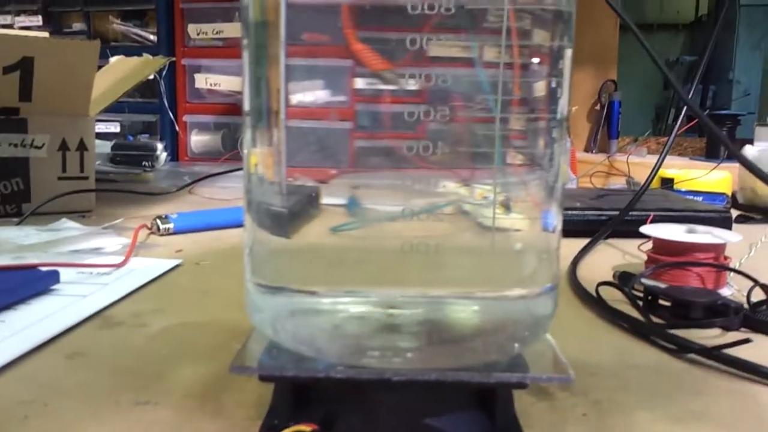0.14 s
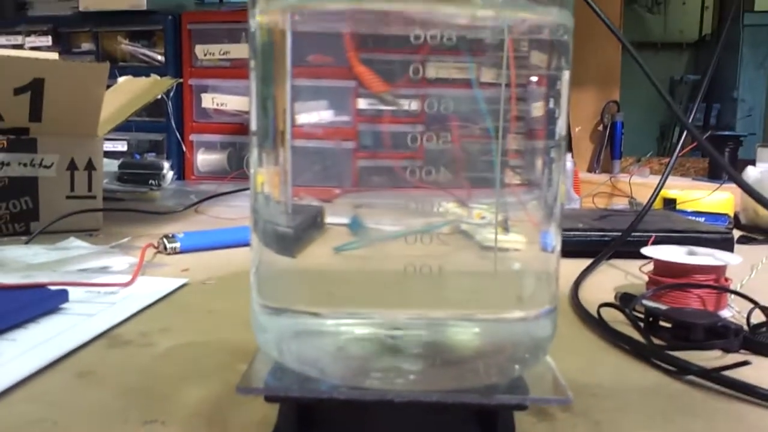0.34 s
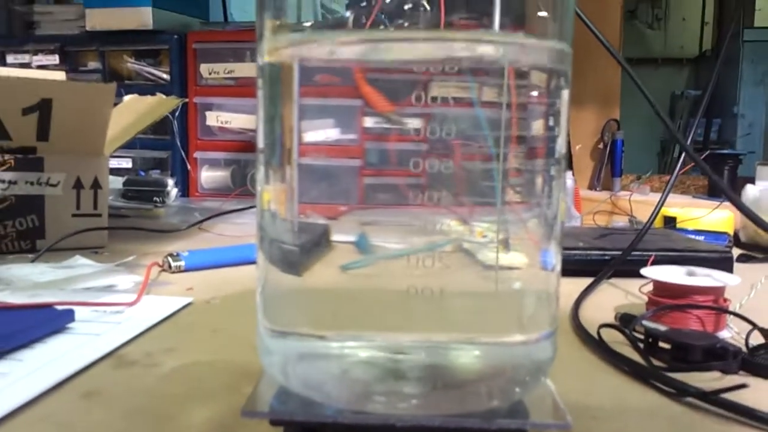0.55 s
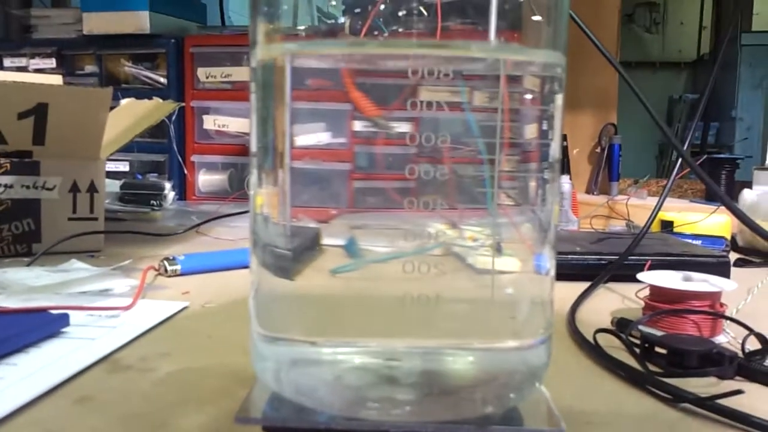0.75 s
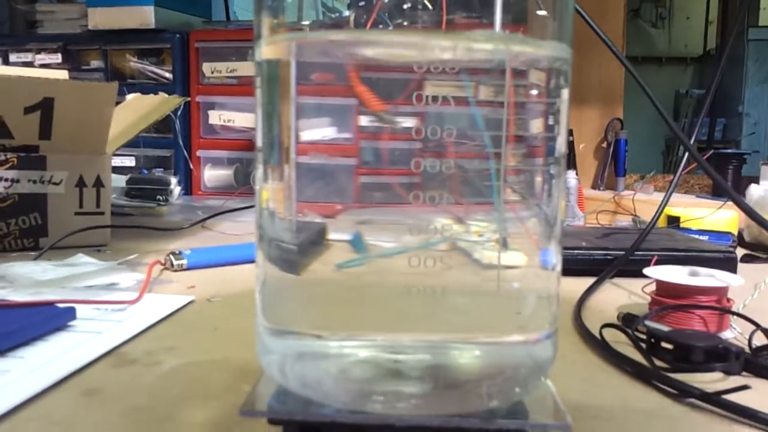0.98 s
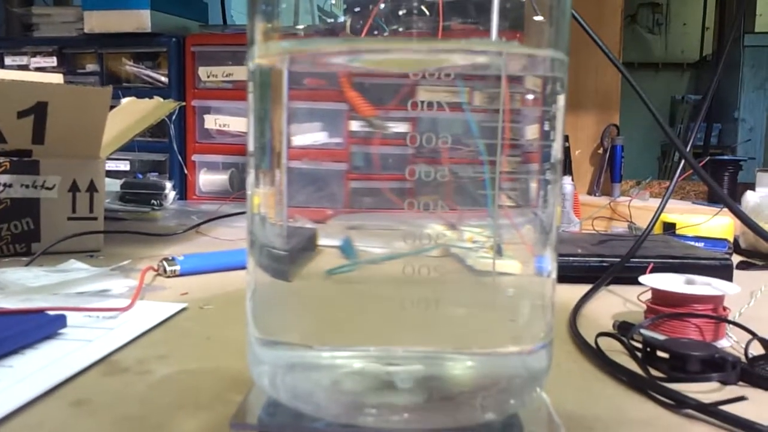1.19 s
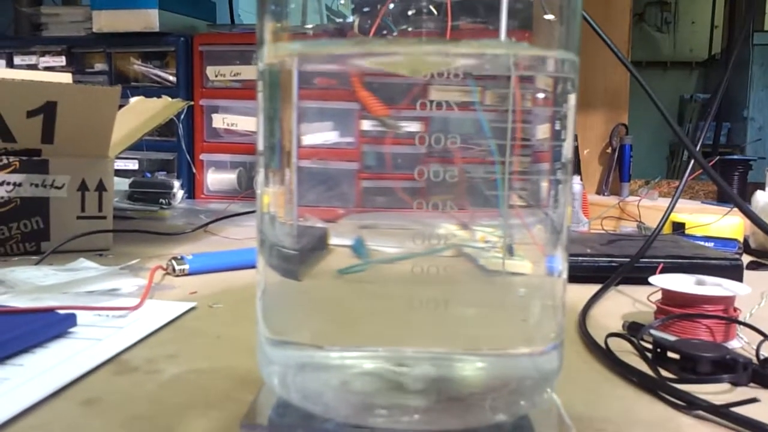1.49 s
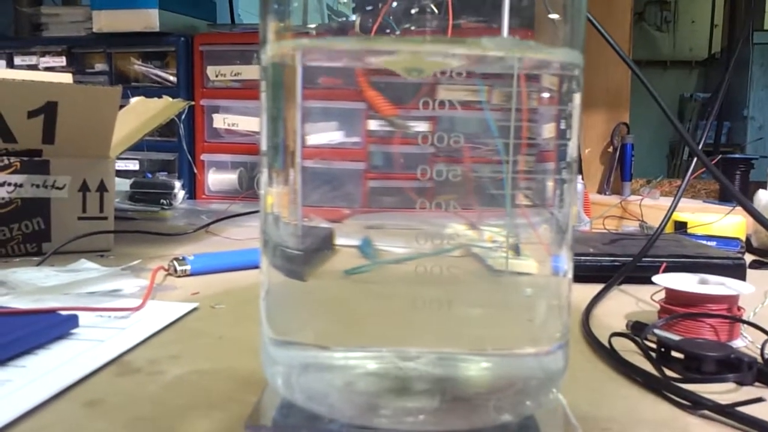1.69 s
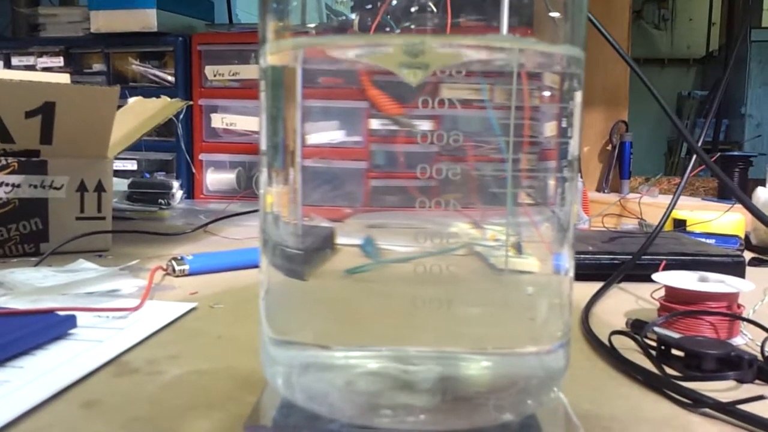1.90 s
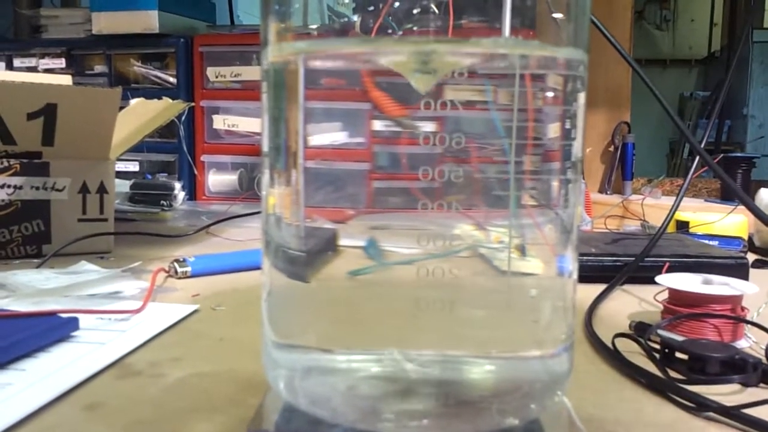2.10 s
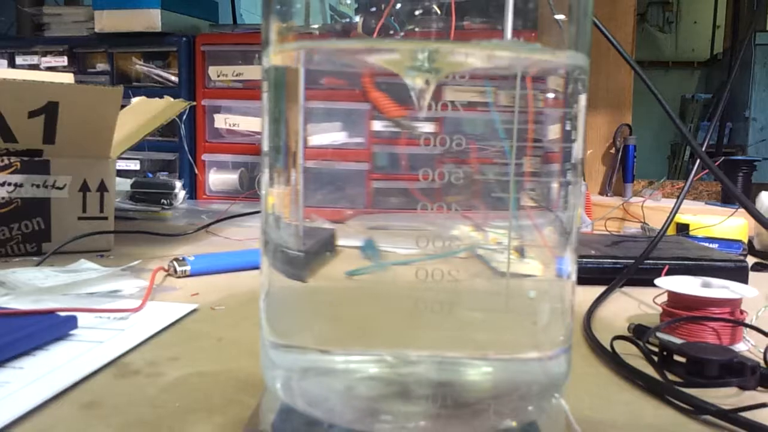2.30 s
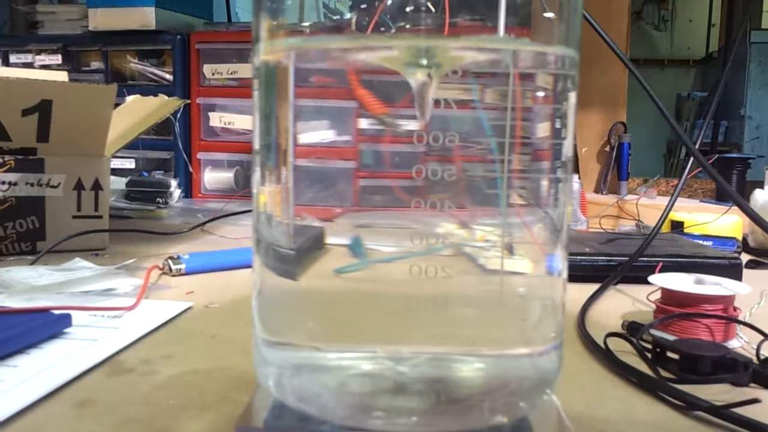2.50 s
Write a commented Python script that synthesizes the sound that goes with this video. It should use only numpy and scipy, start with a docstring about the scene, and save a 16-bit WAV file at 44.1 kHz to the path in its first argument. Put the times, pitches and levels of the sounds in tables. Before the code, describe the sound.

A stir bar rattles rapidly against a glass beaker of water, then settles into a wobbling scrape

```python
"""Knocks of a stir bar on a glass beaker of water come first, faster and faster, over a bright scrape.
The bar then settles into a duller, wobbling scrape with a few stray knocks.
Contact forces of noise bursts and random grains excite the resonances of the glass; a short room follows.
Short low thumps sound under three of the knocks, and a fan motor adds faint hum and a rush of air.
The hardest knocks overload the microphone, which clips them."""
import sys
import numpy as np
from scipy import signal
from scipy.fft import rfft, irfft
from scipy.io import wavfile

SR = 44100
rng = np.random.default_rng(int(sys.argv[2]) if len(sys.argv) > 2 else 0)


def log_audio(samples):
    """Write samples as a 16-bit WAV file to the path given in sys.argv[1]."""
    # one column per channel
    frames = np.atleast_2d(samples).T
    # limit to full scale, then quantise
    limited = np.clip(frames, -1, 1)
    pcm = np.round(limited * 32767).astype(np.int16)
    wavfile.write(sys.argv[1], SR, pcm)


N = 116865  # length [samples]


def amp(db):
    """Level law: decibels to an amplitude ratio."""
    return 10 ** (np.asarray(db) / 20)


def unit(x):
    """Normalization: scales the root mean square to 1."""
    return x / np.sqrt(np.mean(x ** 2) + 1e-20)


def read(points, hz):
    """Spectral interpolation: joins levels in dB linearly along a log-frequency axis."""
    f, db = np.transpose(points)
    return np.interp(np.log(hz + 1), np.log(f + 1), db)


def add(mix, s, sound):
    """Superposition: adds a sound into the mix from time s [s], cut at the end."""
    part = mix[max(round(s * SR), 0):][:len(sound)]
    part += sound[:len(part)]


def knocks():
    """Impact excitation: a hard contact, a brief skid and a soft rebound each set the glass ringing."""
    # blows of the bar on the glass: (time [s], relative strength [dB])
    blows = [(0.0351, -8.5), (0.05, -9.5), (0.0784, -9.5), (0.1253, -5.5), (0.1812, -7.5), (0.2215, -9.0),
             (0.2344, -8.0), (0.2628, -7.5), (0.2869, -8.5), (0.3147, -5.5), (0.3264, -9.0), (0.3645, -4.5),
             (0.4119, -7.0), (0.4384, -7.5), (0.4624, -7.5), (0.4872, -6.0), (0.4983, -9.0), (0.5341, -8.0),
             (0.5679, -10.0), (0.5802, -5.0), (0.6023, -8.5), (0.6233, -7.0), (0.6455, -8.0),
             (0.6697, -7.5), (0.6923, -7.0), (0.7358, -5.0), (0.767, -9.5), (0.7788, -5.0), (0.7995, -8.0),
             (0.8211, -8.0), (0.8425, -7.5), (0.8643, -6.0), (0.8855, -5.0), (0.9049, -7.0), (0.9269, -4.5),
             (0.9675, -5.0), (0.9868, -9.5), (1.006, -6.5), (1.0278, -6.5), (1.048, -5.0), (1.068, -5.5),
             (1.0882, -8.0), (1.1077, -6.5), (1.1178, -9.5), (1.1472, -8.0), (1.1857, -5.5),
             (1.1949, -10.0), (1.2245, -6.5), (1.243, -9.0), (1.2629, -7.0), (1.2816, -6.5), (1.3165, -6.0),
             (1.352, -7.5), (1.3715, -9.5), (1.3893, -8.0), (1.3982, -9.5), (1.4053, -9.0), (1.416, -10.0),
             (1.4258, -8.0), (1.4742, -8.0), (1.4822, -7.0), (1.4905, -7.5), (1.4998, -8.0), (1.5088, -9.5),
             (1.5263, -8.5), (1.5507, -10.0), (1.5591, -4.5), (1.5919, -4.0), (1.8303, -3.0),
             (1.8848, -6.5), (1.892, -6.0), (1.9469, -6.0), (2.0015, -5.5), (2.0629, -2.0), (2.1794, -7.0),
             (2.223, -4.5), (2.2302, -6.5), (2.3948, -3.5)]
    # colour of a blow: (frequency [Hz], relative level [dB])
    blow_tone = [(60, -6), (300, -9), (1000, -4), (3000, -7.5), (5500, -5.5), (7500, 0.5), (8400, 5),
                 (9200, 2), (11000, 3.5), (15000, -5.5)]
    knock_db, rebound_db = 22, -14.5  # gain of all blows; rebound relative to its blow
    contact_s, skid_s, skid_gain = 0.00019, 0.0035, 4.7
    rebound_s = .0095  # mean delay of the rebound
    force = np.zeros(N)
    t = np.arange(512) / SR
    for s, db in blows:
        length, flight = rng.uniform(.8, 1.2, 2)
        contact = np.exp(-t / contact_s)
        skid = skid_gain / (1 + (t / (skid_s * length)) ** 6)
        envelope = contact + skid
        add(force, s, amp(knock_db + db) * burst(envelope))
        add(force, s + rebound_s * flight, amp(knock_db + db + rebound_db) * burst(envelope))
    return beaker(force, blow_tone)


def burst(envelope, count=2):
    """Broadband contact noise: alternates a flat spectrum with the envelope, then sets energy to 1."""
    x = rng.standard_normal(len(envelope)) * envelope
    for _ in range(count):
        spectrum = rfft(x)
        flat = irfft(spectrum / (abs(spectrum) + 1e-12), len(x))
        x = flat * np.sqrt(envelope)
    return x / np.linalg.norm(x)


def scrape():
    """Sliding friction: pressure modulates random grains, bright while rattling, duller once settled."""
    # pressure of the bar on the bottom: (time [s], relative level [dB])
    pressing = [(0, -15.5), (.22, -16.5), (.6, -15), (1.0, -15), (1.42, -15.5), (1.445, -17.5),
                (1.47, -15.5), (1.61, -15), (1.63, -14.5), (1.83, -13), (1.865, -16), (1.89, -14),
                (2.1, -13.5), (2.39, -12), (2.425, -12.5), (2.46, -14), (2.65, -12)]
    # colour while the bar rattles: (frequency [Hz], relative level [dB])
    rattle_tone = [(60, -14), (300, -1), (1000, 4.5), (3000, 1), (5500, 4), (8400, 1.5), (9200, -1),
                   (11000, 0.5), (15000, -5.5)]
    # colour once the bar has settled: (frequency [Hz], relative level [dB])
    settled_tone = [(60, -6), (300, 2.5), (1000, -1), (2200, 2.5), (3000, -3), (3500, -0.5), (5500, 2.5),
                    (7400, 1.5), (8400, -4), (9150, 2), (10000, -1.5), (12000, -3.5), (15000, -12.5)]
    settled_s = 1.6
    wobble_hz, wobble_peak_s, wobble_db = 17.7, 2.062, 2  # presses harder once per wobble
    taps_db, settled_taps = 9, .35  # tap depth, and the share of it kept once settled
    rough_db = 1.4  # rms of the random flutter
    t = np.arange(N) / SR
    settled = t > settled_s
    wobble = wobble_db * settled * np.cos(2 * np.pi * wobble_hz * (t - wobble_peak_s))
    jabs = taps()
    tapping = taps_db * np.where(settled, settled_taps, 1) * (jabs - jabs.mean())
    roughness = rough_db * drift(rate_hz=68)
    level_db = np.interp(t, *np.transpose(pressing)) + wobble + tapping + roughness
    force = amp(level_db) * grains(per_s=9000, spread_db=0.5)
    rattling = beaker(force * ~settled, rattle_tone)
    sliding = beaker(force * settled, settled_tone)
    return rattling + sliding


def taps(count=400):
    """Jittered pulse train: one light jab of pressure (0-1) at a random moment of every time slot."""
    taps_per_s, tap_s = 100, .003  # slot rate, time for a jab to fall to half
    jabs = np.zeros(N)
    t = np.arange(1024) / SR
    for k, (late, size) in enumerate(rng.random((count, 2))):
        add(jabs, (k + late) / taps_per_s, (.5 + .5 * size) / (1 + (t / tap_s) ** 4))
    return np.minimum(jabs, 1)


def grains(per_s, spread_db):
    """Shot noise: tiny impacts of random time, sign and uneven size, at rms 1."""
    size = amp(spread_db * np.minimum(rng.exponential(1, N), 3)) * rng.choice([-1, 1], N)
    return unit(size * (rng.random(N) < per_s / SR))


def drift(rate_hz):
    """Band-limited random modulation of rms 1, strongest at half of rate_hz."""
    f = np.fft.rfftfreq(N, 1 / SR) / rate_hz
    return unit(irfft(rfft(rng.standard_normal(N)) * np.sqrt(f) * np.exp(-f ** 2), N))


def beaker(force, tone, size=8192):
    """Modal resonance: a contact force drives the glass as a minimum-phase filter of energy 1."""
    # modes of the filled beaker: (frequency [Hz], width [Hz], relative level [dB])
    glass_modes = [(875, 70, -18), (925, 44, -11.5), (1780, 44, -10.5), (3042, 21, 3.5), (3100, 90, -11),
                   (3558, 60, -9), (3995, 50, -1.5), (4045, 44, 1), (5315, 80, -5.5), (5930, 80, -6),
                   (6300, 140, -9), (6515, 50, -8), (7350, 320, -5), (8110, 190, -7), (8430, 170, -1),
                   (8610, 200, -4), (9080, 260, -1), (10000, 280, -5), (11650, 500, -9.5),
                   (12900, 600, -13.5), (13470, 140, -14)]
    # dense weak modes of the beaker and what it stands on: (frequency [Hz], relative level [dB])
    body = [(30, -76), (120, -40), (270, -28.5), (700, -34), (1300, -35.5), (2200, -24), (2850, -29.5),
            (3200, -17.5), (4700, -18), (6500, -14.5), (9500, -22.5), (10700, -19.5), (13300, -13),
            (14000, -17), (14800, -6), (15700, -20.5)]
    skirt = 1.39  # steepness of the flanks of each mode
    hz = abs(np.fft.fftfreq(size, 1 / SR)) + 1
    power = amp(read(body, hz)) ** 2
    for f, width, db in glass_modes:
        detuning = f / width * (hz / f - f / hz)
        power = power + amp(db) ** 2 / (1 + detuning ** 2) ** skirt
    gain = unit(np.sqrt(power) * amp(read(tone, hz)))
    # the Hilbert transform of the log gain gives the phase of a causal ring
    log_response = np.conj(signal.hilbert(np.log(gain + 1e-9)))
    ring = np.fft.ifft(np.exp(log_response)).real
    return signal.fftconvolve(force, ring[:size // 2])[:N]


def thumps():
    """Damped oscillation: a short, low, quickly damped thump under three knocks."""
    # low thumps: (time [s], amplitude before damping [dB])
    thump_starts = [(0.738, -36), (1.047, -34), (2.064, -27)]
    thump_hz, thump_s = 84.5, 0.0036  # pitch, decay time constant
    out = np.zeros(N)
    t = np.arange(2048) / SR
    for s, db in thump_starts:
        add(out, s, amp(db) * np.sin(2 * np.pi * thump_hz * t) * np.exp(-t / thump_s))
    return out


def room(x):
    """Diffuse reverberation: bench and shelves return an exponentially decaying noise tail of energy 1."""
    t60_s = 0.067
    t = np.arange(SR // 2) / SR
    tail = rng.standard_normal(len(t)) * 1000 ** (-t / t60_s)
    tail = tail * (t > .002)  # reflections start after 2 ms
    return signal.fftconvolve(x, tail / np.linalg.norm(tail))[:N]


def motor():
    """Frequency modulation: faint tones waver in pitch within the rush of air."""
    # motor tones: (frequency [Hz], rms level [dB])
    hum = [(140, -65.5), (180, -65), (250, -57), (335, -58), (550, -55)]
    air_db = -46.5
    tones = 0
    for hz, db in hum:
        wavering_hz = hz * (1 + 0.01184 * drift(rate_hz=8.4))
        tones = tones + amp(db) * np.sin(2 * np.pi * np.cumsum(wavering_hz) / SR)
    return np.sqrt(2) * tones + amp(air_db) * air()


def air():
    """Turbulence noise: white noise shaped into the soft rush of the fan, at rms 1."""
    # air from the fan: (frequency [Hz], relative spectral density [dB per Hz])
    rush = [(20, -36), (60, -35), (115, -7.5), (240, -13.5), (500, -2), (2000, -7), (15000, -41)]
    gain = amp(read(rush, np.fft.rfftfreq(N, 1 / SR)))
    return unit(irfft(rfft(rng.standard_normal(N)) * gain, N))


def scene():
    """Superposition of glass, room, low thumps and motor, alike in both channels."""
    room_db = -13.5
    glass = knocks() + scrape()
    mono = glass + amp(room_db) * room(glass) + thumps() + motor()
    return np.array([mono, mono])


def record(dry):
    """Amplitude limiting: the input clips hard knocks, then a low-pass filter limits the band."""
    clip_level, edge_hz = .9, 15800
    clipped = np.clip(dry, -clip_level, clip_level)
    low_pass = signal.firwin(1023, edge_hz, window=("kaiser", 8), fs=SR)
    return signal.oaconvolve(clipped, low_pass[None], "same")


dry = scene()
out = record(dry)
log_audio(out)
```